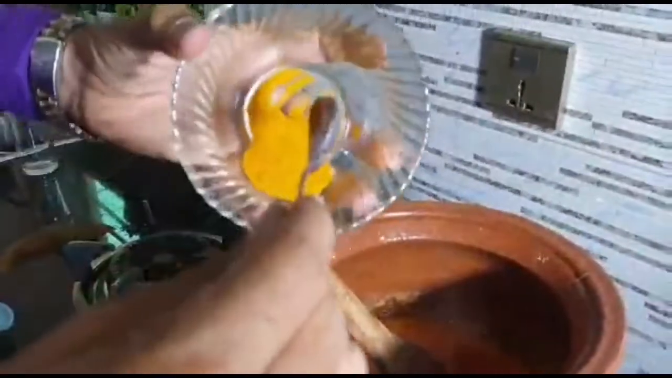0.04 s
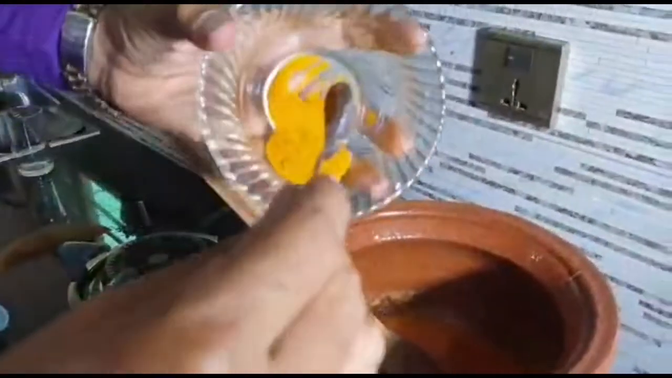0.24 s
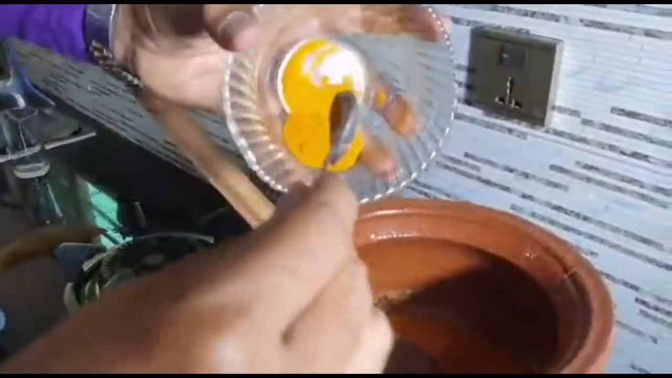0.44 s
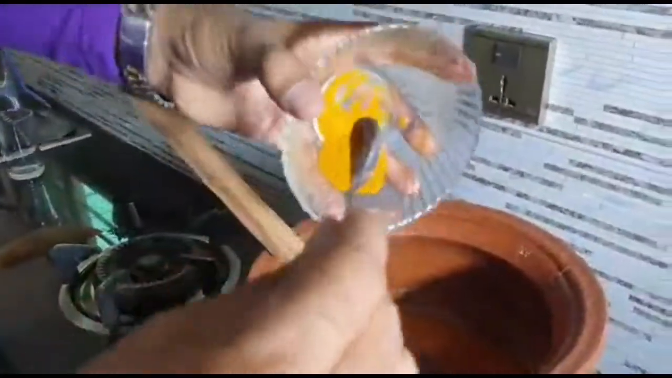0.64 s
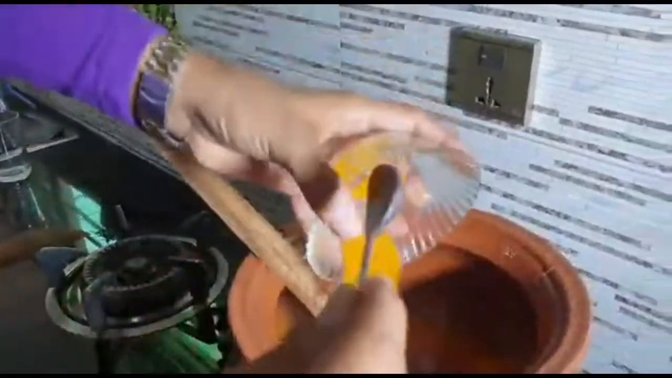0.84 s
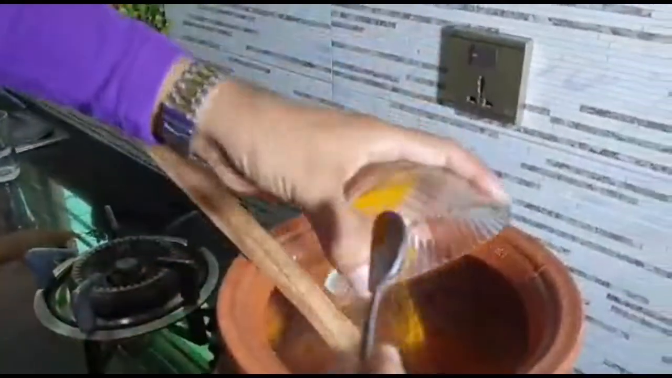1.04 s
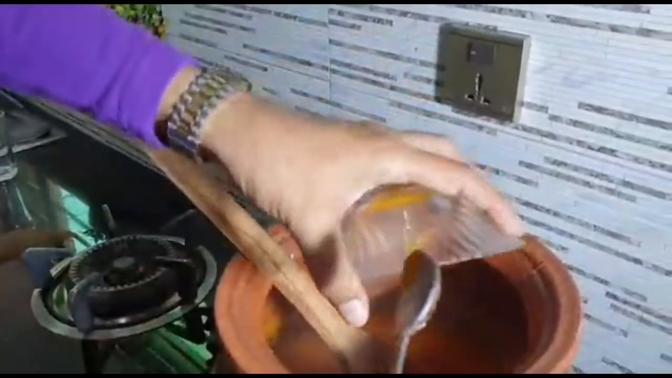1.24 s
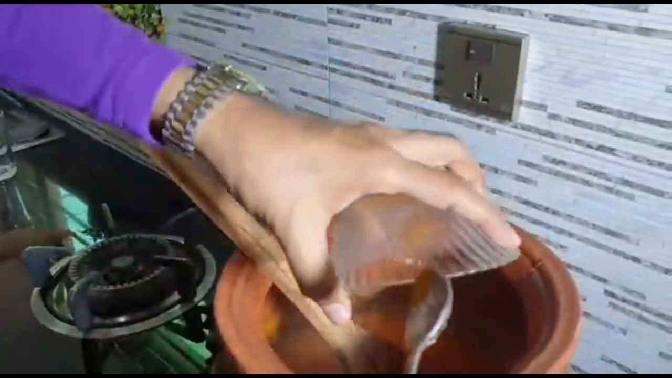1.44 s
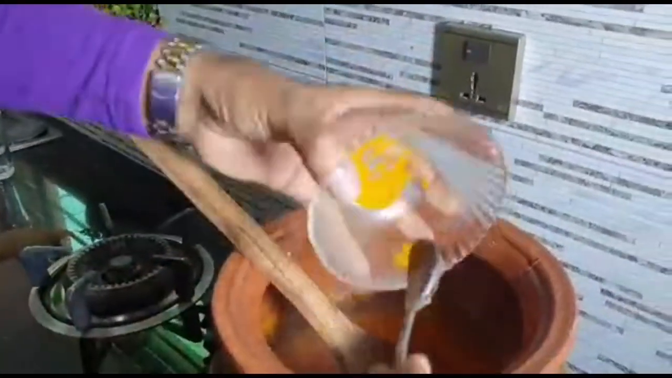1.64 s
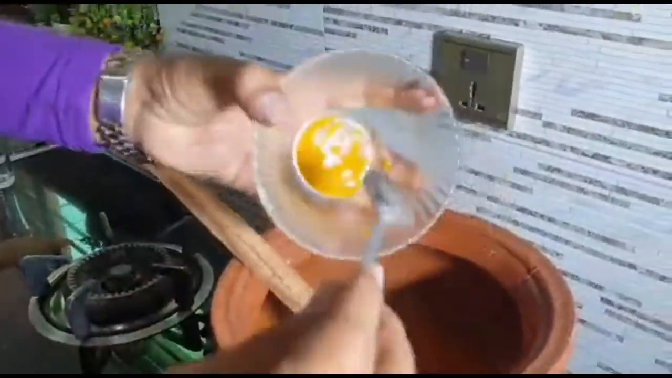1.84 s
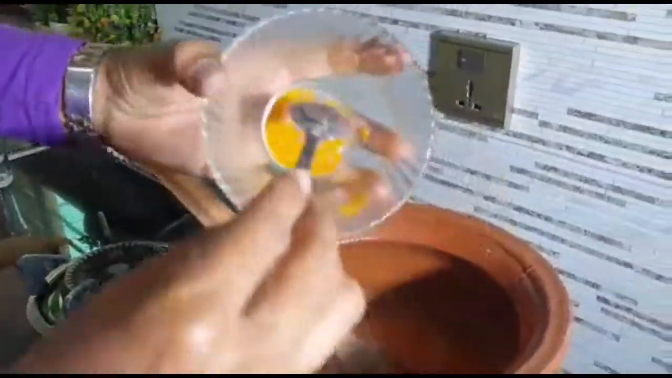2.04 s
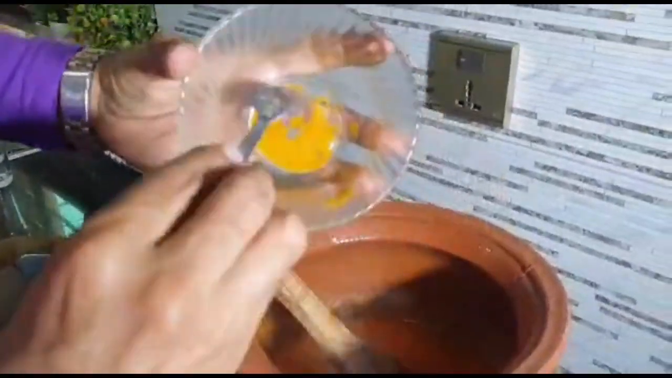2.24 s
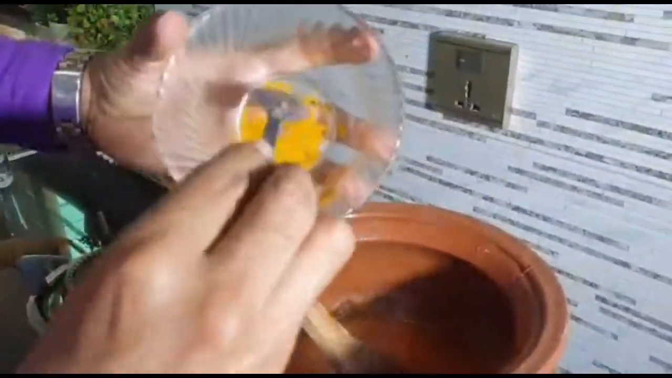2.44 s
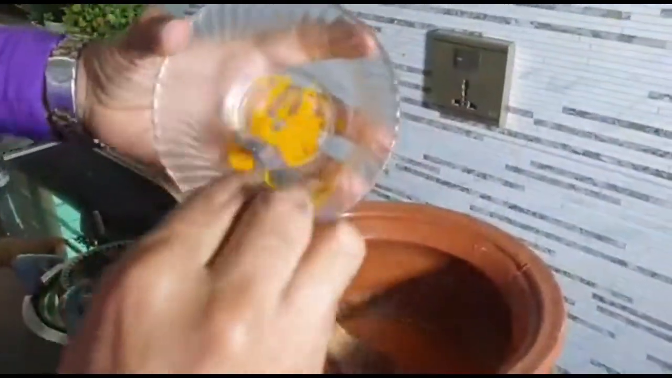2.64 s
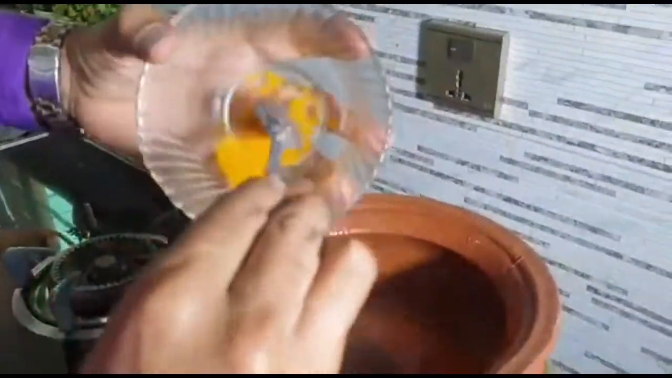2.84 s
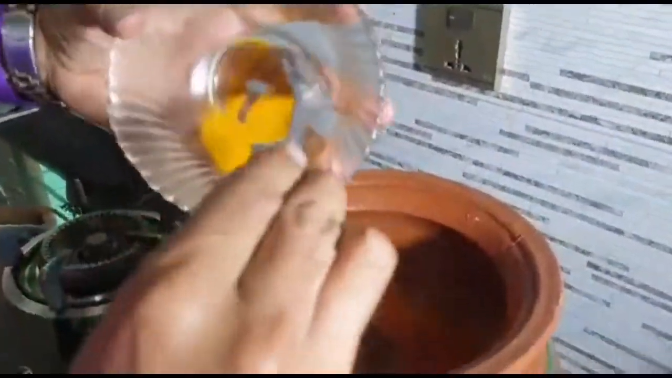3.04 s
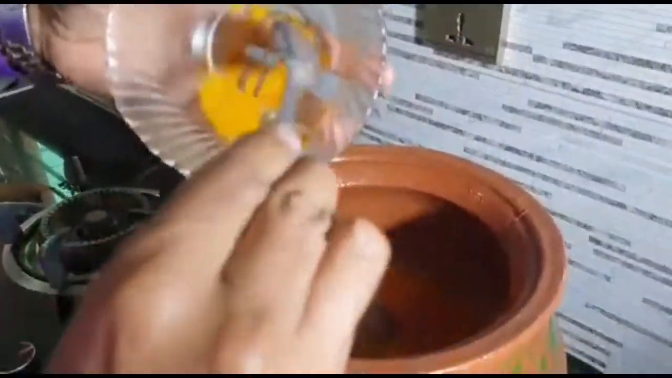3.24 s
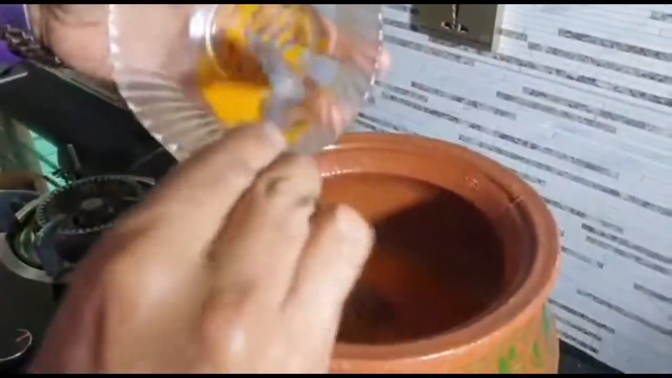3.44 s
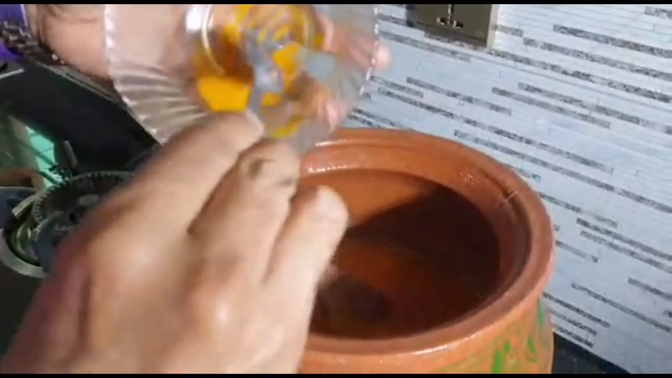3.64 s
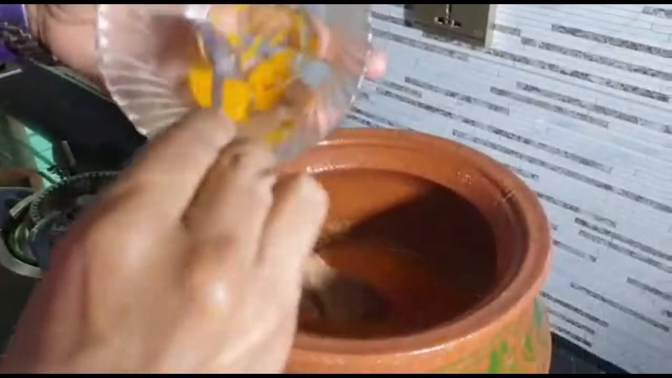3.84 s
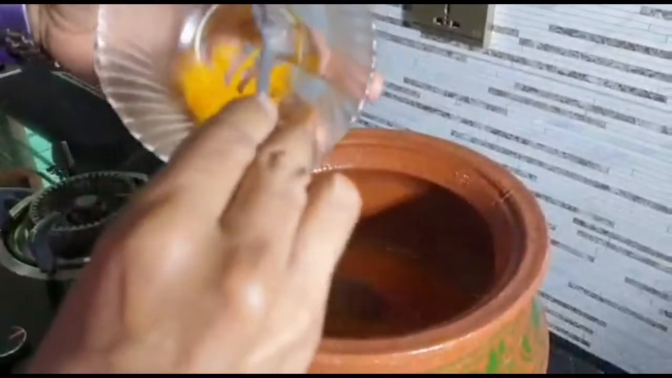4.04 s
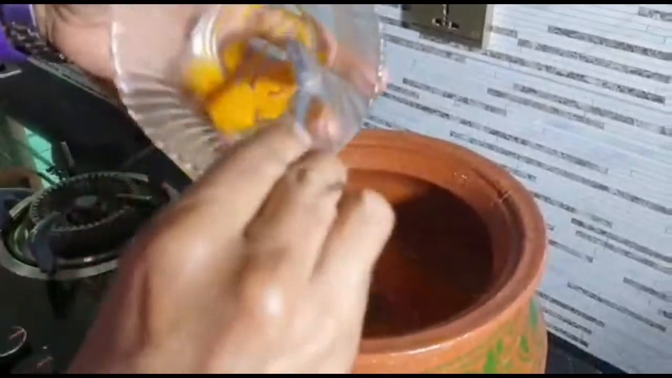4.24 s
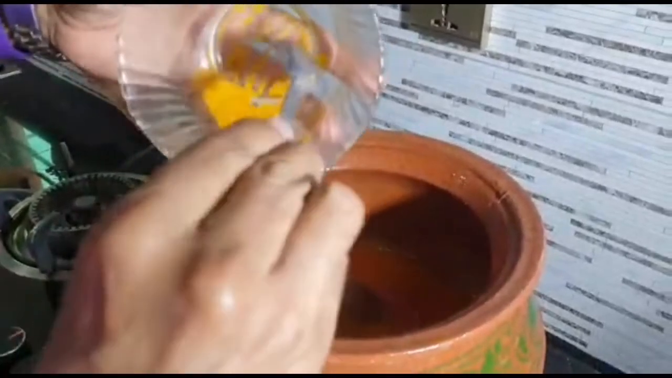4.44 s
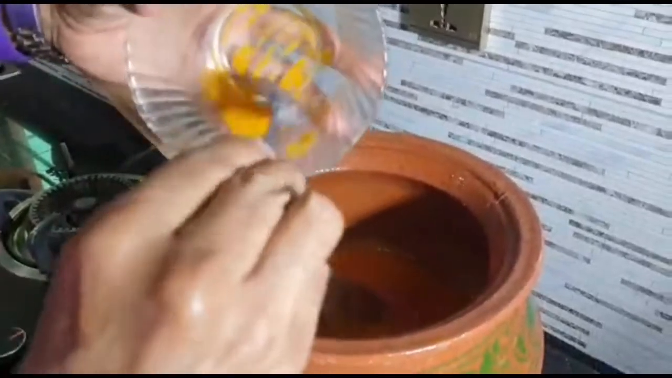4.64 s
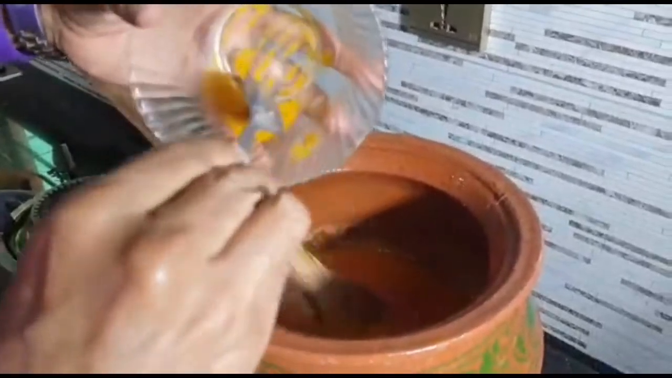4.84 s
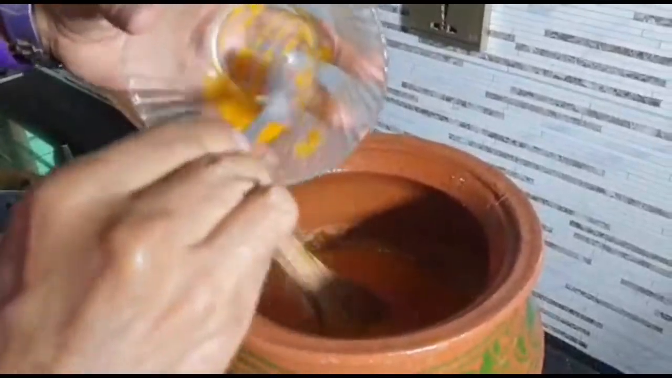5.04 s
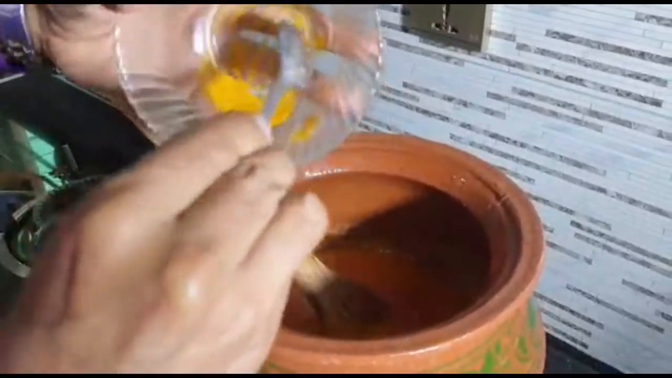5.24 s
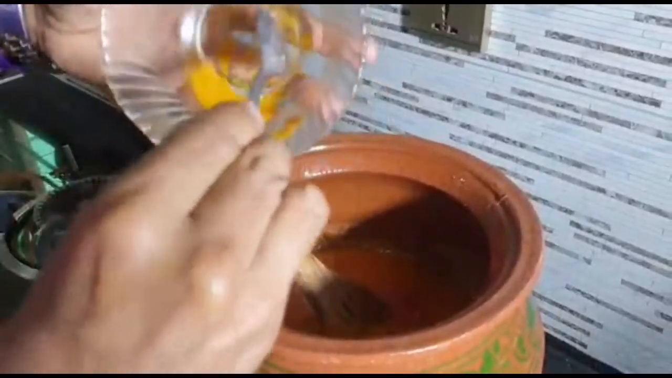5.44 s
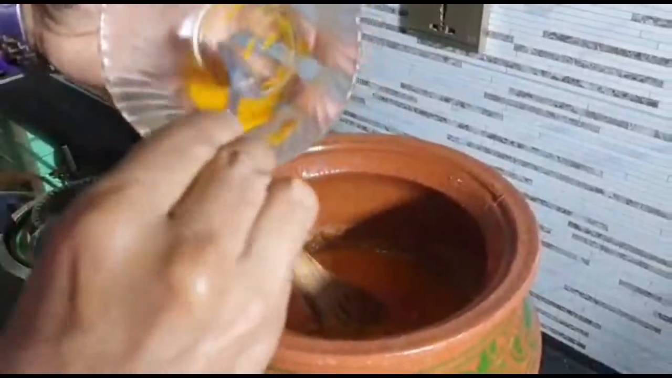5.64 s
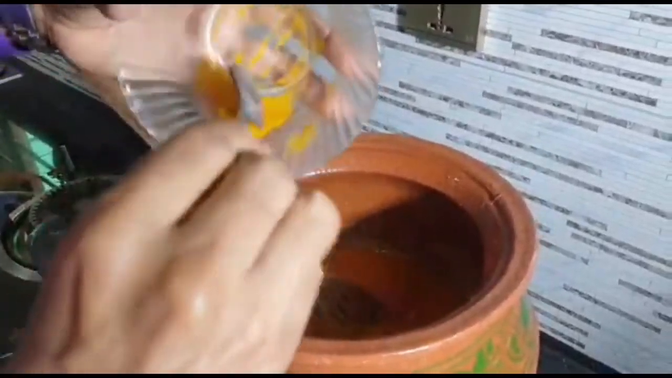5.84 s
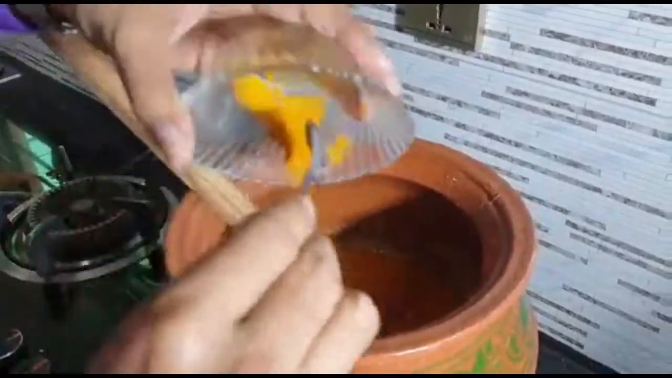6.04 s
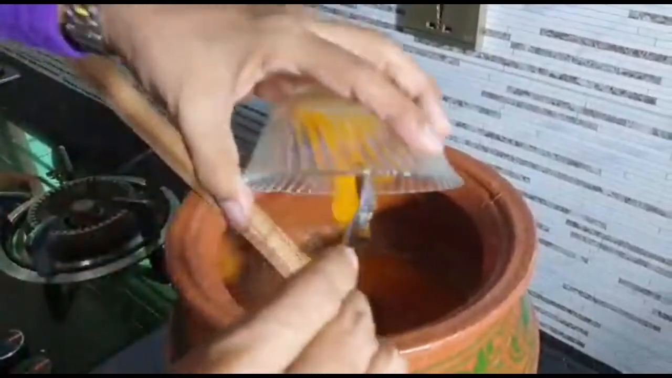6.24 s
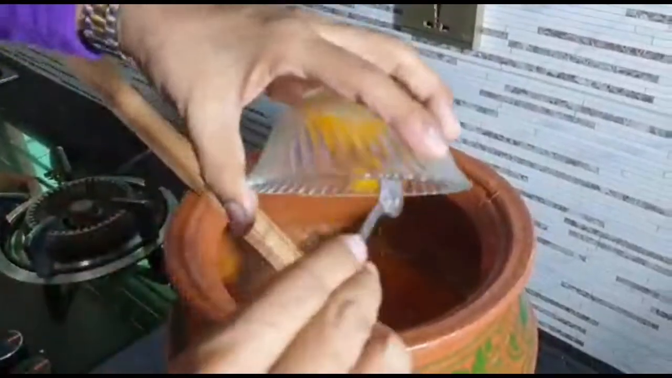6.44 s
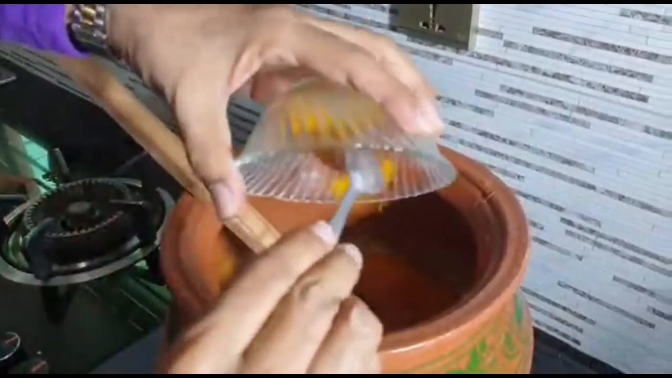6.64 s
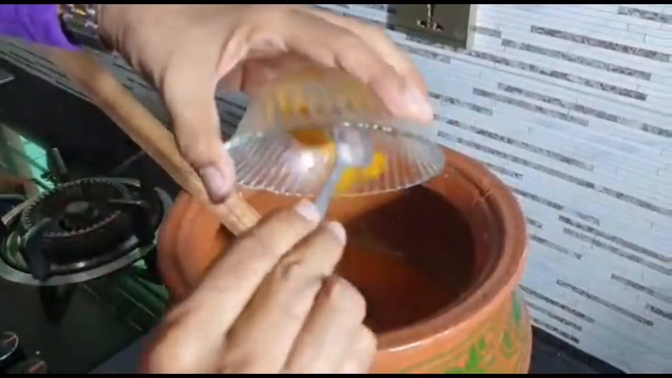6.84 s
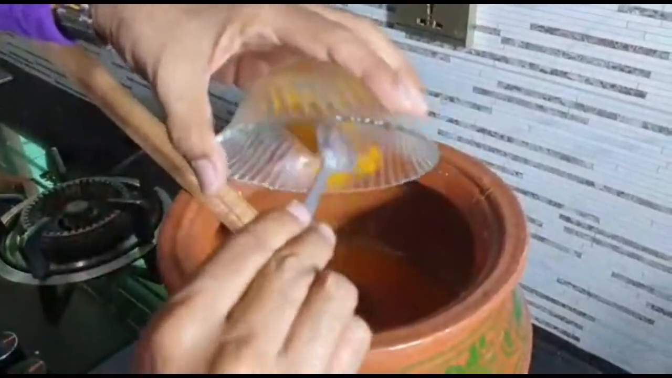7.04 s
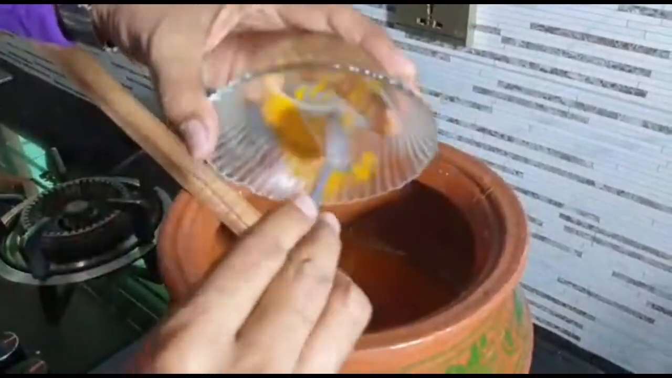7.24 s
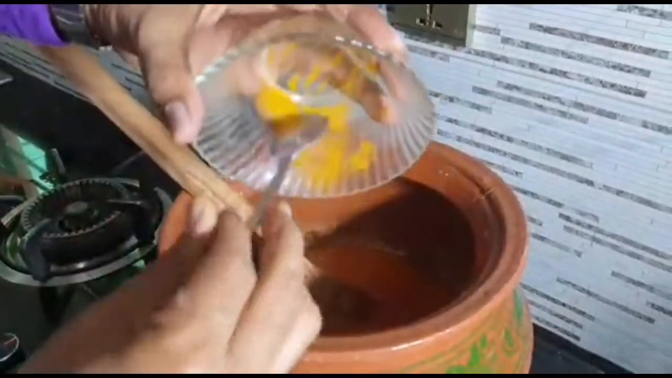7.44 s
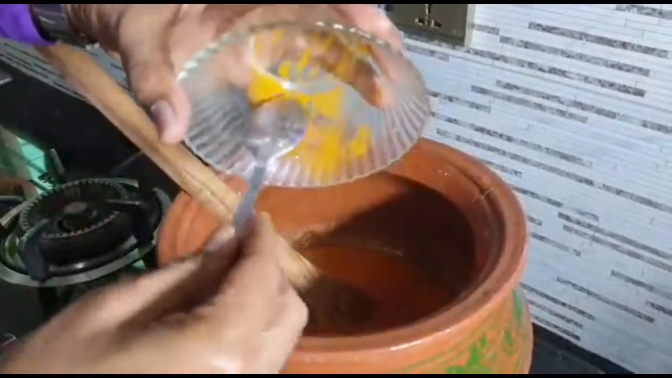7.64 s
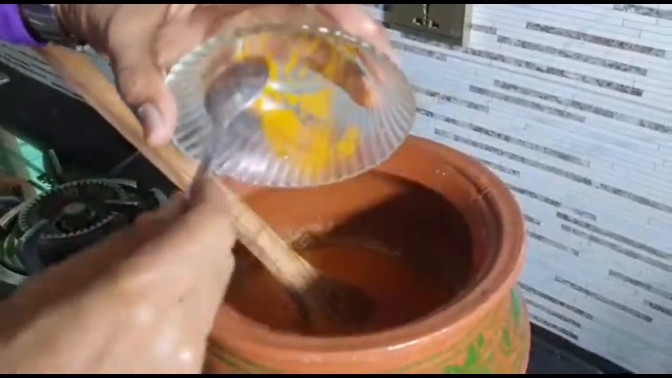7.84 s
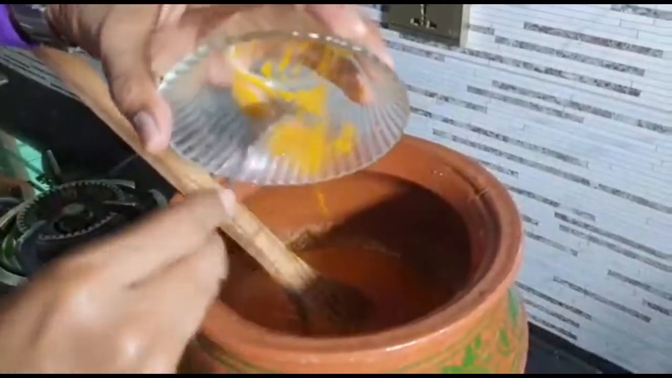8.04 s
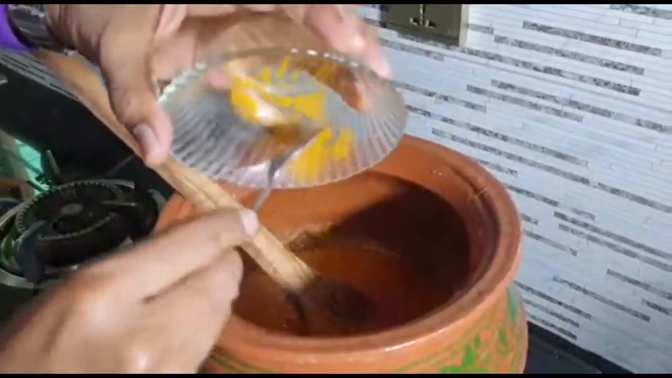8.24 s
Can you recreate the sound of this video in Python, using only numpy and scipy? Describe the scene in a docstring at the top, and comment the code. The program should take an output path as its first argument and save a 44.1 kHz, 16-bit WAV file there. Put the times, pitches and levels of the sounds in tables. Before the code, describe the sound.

A wavering low hum and soft rustle of hands and powder fill the first two seconds, with a faint, more distant utensil clink at 0.3 s, barely audible touches and a very faint steel ring near 1.2 s. From 2.3 to 5.9 s a steel spoon digs into a hand-held glass bowl, about four strokes a second: dull, damped clacks, some sharper and sizzling, followed by short gritty, squeaky scrapes. Glass rings out at about 3.6 and 4.3 s; low thumps on the right fall near 3.6 and 3.9 s. The hum sinks around 5 to 6 s, then returns during a lull of light ticks. From 6.7 to 7.4 s five taps ring the tipped bowl, two with thumps. Weaker contacts come at 7.9 s, then a clear ringing tap with a thump at 8.2 s and a brief hollow clay-pot rub. Close microphone, reflective kitchen.

```python
"""A low hum and a soft rustle of hands and powder come first, then a faint clink and light touches in the powder.
Then a steel spoon digs spice powder out of a hand-held glass bowl, close to the microphone, in a kitchen.
Pressed into the base it clacks dully and scrapes; against the free wall it makes the glass ring.
Some blows come with a low thump, mostly on the right; last comes a brief hollow rub at the clay pot below.
Blows are shaped noise bursts plus fading sines; scrapes, rustle and hum are shaped noise."""
import sys
import numpy as np
from scipy import signal
from scipy.fft import rfft, irfft, next_fast_len
from scipy.io import wavfile
from scipy.ndimage import map_coordinates

SR = 44100
rng = np.random.default_rng(int(sys.argv[2]) if len(sys.argv) > 2 else 0)


def master_out(mix):
    """Clip the mix to full scale and print it as 16-bit PCM to the path in sys.argv[1]."""
    frames = np.transpose(np.atleast_2d(mix))
    ceiling = np.clip(frames, -1, 1)
    pcm = np.round(ceiling * 32767).astype(np.int16)
    wavfile.write(sys.argv[1], SR, pcm)


N = 366030  # length of the scene in samples
T = np.arange(SR // 2) / SR  # the half-second life of one blow, in seconds

# Spectrum of the sharp crack of a hard contact: pitch_hz [Hz], level_db [dB per Hz]
CRACK_SPECTRUM = [(1200, -31.5), (2100, -3.5), (2800, 4), (3700, 2), (4500, 0), (5200, 3), (6000, -1.5),
                  (7200, 2.5), (8300, -15), (10000, -21), (14000, -34.5)]
# Spectrum of the treble sizzle of a contact: pitch_hz [Hz], level_db [dB per Hz]
SIZZLE_SPECTRUM = [(7000, -24.5), (9300, -3), (9900, -5), (10700, -14), (11600, -2.5), (12300, -12),
                   (13450, 3.5), (14350, -15.5), (14900, 1), (15700, -13.5)]
# Spectrum of crushed powder grains: pitch_hz [Hz], level_db [dB per Hz]
GRIT_SPECTRUM = [(300, -1), (1300, -2), (2200, -4), (4200, -12.5), (5200, -8), (7200, -5.5), (8400, -9),
                 (11500, -5), (15000, -29), (16000, -20.5)]
# The spoon's own modes: pitch_hz [Hz], level_db [dB], t60_s [s], left_over_right_db [dB]
SPOON_MODES = [(9820, -2, .28, -5), (9960, 0, .08, -6), (10350, -13, .06, -5), (13520, -6, .14, -2)]

SIZZLE_GROWS = 1.5  # dB of sizzle gained per dB of hardness


def digs():
    """The spoon digs into the base: the harder the contact, the more of the blow goes into the treble."""
    # Digs; powder cushions the spoon, bare glass makes the contact hard:
    # start_s [s], strength_db [dB], hardness_db [dB], ring_db [dB over the strength]
    dig_rows = [(2.3001, -27, -16.5, -36), (2.5744, -36, -21, -44), (2.8595, -22, -6.5, -7),
                (3.1353, -23.5, -19.5, -23), (3.3775, -28, -11, -10), (3.3868, -23.5, -17, -18),
                (3.615, -29, -12, -4), (3.8208, -33, 2.5, -15), (3.9366, -27.5, 5, -4),
                (4.0872, -39.5, -6, -28), (4.2028, -32, 1, -26), (4.345, -28.5, -10, -2),
                (4.5795, -26.5, -11.5, -24), (4.6765, -33.5, -12, -18), (4.8011, -32.5, -8, -10),
                (4.822, -26.5, -9, -30), (5.0597, -24, -7.5, -22), (5.1499, -29.5, -3.5, -7),
                (5.299, -23.5, -10, -26), (5.535, -27.5, -6, -21), (5.8203, -25.5, -5, -24),
                (5.9284, -35.5, -15, -30), (7.883, -38, -13.5, -19)]
    # Where the spoon digs: time_s [s], left_over_right_db [dB]
    dig_side = [(2.3, -3), (3.1, -1), (4.4, .5), (5.0, -2), (7.9, 0)]
    out = np.zeros((2, N))
    for start_s, strength_db, hardness_db, ring_db in dig_rows:
        # a spoon that stays pressed in the base chokes the after-ring
        release = 1 / (1 + amp(-ring_db - 10.5))
        low_db = strength_db + ring_db
        hit = blow(
            clack_db=strength_db,
            crack_db=strength_db + hardness_db,
            sizzle_db=strength_db - 5.5 + SIZZLE_GROWS * hardness_db,
            ting_db=strength_db - 4 + 1.4 * hardness_db,
            low_db=low_db,
            high_db=low_db - 12,  # a dig wakes the high modes less than the low ones
            release=release)
        side_db = np.interp(start_s, *np.transpose(dig_side))
        add(out, start_s, pan(side_db) * hit)
    return out


def taps():
    """The wall rings freely; tipped over the pot and gripped from above, the bowl clacks more and sizzles less."""
    # Taps on the free wall: start_s [s], crack_db, low_ring_db, high_ring_db, spoon_ting_db [all dB],
    # tipped [0 upright to 1 tipped], after_ring_db [dB]
    tap_rows = [(3.584, -24, -20.5, -14.5, -50, 0, -.5), (4.3285, -26.5, -17, -15, -40, 0, -3),
                (6.692, -23.5, -27, -19, -48, 1, -.5), (6.8438, -22, -24.5, -17, -41, 1, -.5),
                (7.0011, -24, -18, -29, -30, 1, -2), (7.1611, -20, -18, -19.5, -27, .8, 0),
                (7.3828, -31, -26.5, -30, -60, 1, -1), (7.9263, -39.5, -37, -35, -65, .3, -7),
                (8.1815, -24, -20, -16, -45, 0, 0)]
    out = np.zeros((2, N))
    for start_s, crack_db, low_db, high_db, ting_db, tipped, after_db in tap_rows:
        # each pair holds the value for the upright and for the tipped bowl
        clack_db = crack_db + np.interp(tipped, (0, 1), (-10, -4))
        sizzle_db = crack_db + np.interp(tipped, (0, 1), (1, -13))
        side_db = np.interp(tipped, (0, 1), (2.5, -1.8))
        hit = blow(clack_db, crack_db, sizzle_db, ting_db, low_db, high_db, release=amp(after_db))
        add(out, start_s, pan(side_db) * hit)
    return out


def blow(clack_db, crack_db, sizzle_db, ting_db, low_db, high_db, release):
    """One contact: the base's damped clack, a crack with sizzle, the spoon's ting, the glass's ring and the room."""
    # Spectrum of the dull clack: pitch_hz [Hz], level_db [dB per Hz]
    clack_spectrum = [(120, -28), (300, -18), (600, -12), (850, -3.5), (1040, -5), (1200, 2.5), (1520, -.5),
                      (1800, -9), (2300, -16.5), (2850, -17), (3500, -38)]
    # Damped modes of bowl and spoon pressed together: pitch_hz [Hz], level_db [dB], t60_s [s],
    # left_over_right_db [dB]
    pressed_modes = [(850, -2, .05, 5), (1040, -7, .05, 5), (1184, -2, .06, 4), (1336, -3, .18, 2),
                     (1512, -2, .06, 6), (1733, -5, .06, 6), (2290, -11, .08, 6), (2762, -10, .15, 4)]
    # The bowl's low and high modes, struck separately; same columns
    low_modes = [(1340, -17, .45, 3), (2790, -20, .22, 3), (3456, -2, .45, 5), (3470, -3, .42, 5),
                 (3570, -13, .12, 2), (3790, -15, .1, 2), (4050, -17, .1, 0), (5100, -19, .2, 0)]
    high_modes = [(6178, -5, .33, -5), (6196, -1, .35, -6), (6330, -14, .1, -6), (6900, -14, .12, -2),
                  (9283, -17, .25, -1), (9812, -16, .35, -7), (11200, -24, .14, 0), (14790, -21, .27, 1)]

    clack = amp(clack_db - 2.7) * pan(6.4) * burst(clack_spectrum, t60=.036, spike=0.82, apart=0.75)
    clack += amp(clack_db - 6) * ring(pressed_modes, grip_t60=.04, free=.07, scatter_db=2.5)
    clack = lead_left(clack)

    crack = amp(crack_db) * pan(0.96) * burst(CRACK_SPECTRUM, t60=.052, spike=0.17, apart=1.0)
    crack += amp(sizzle_db) * pan(-1) * burst(SIZZLE_SPECTRUM, t60=.052, spike=0.26, apart=.9)

    glass = amp(low_db) * ring(low_modes, grip_t60=.06, free=0.15 * release, scatter_db=0)
    glass += amp(high_db) * ring(high_modes, grip_t60=.055, free=.05, scatter_db=0.5)
    ting = amp(ting_db) * ring(SPOON_MODES, grip_t60=0.041, free=.12, scatter_db=1.0)

    to_room = amp(-12.5) * clack + amp(-11.5) * crack
    to_room = to_room + amp(-13) * np.sqrt(release) * glass + amp(-17.5) * ting
    sound = kitchen(to_room)
    sound[:, :len(T)] += clack + crack + glass + ting
    return sound


def lead_left(x, lag_s=.00012):
    """The base of the bowl lies nearer the left port, so its sound reaches the right one later."""
    lags = np.array([[0], [lag_s]])
    return filtered(x, lambda hz: np.exp(-2j * np.pi * hz * lags))


def ticks():
    """Light touches are too soft to set the glass ringing; they brighten with hardness as the digs do."""
    # Touches in the powder: start_s [s], strength_db [dB], hardness_db [dB]
    tick_rows = [(0.476, -54, -8), (0.5218, -47.5, -16), (0.645, -53, -3), (0.7268, -52, -1),
                 (1.1284, -53.5, 0), (1.1639, -53, 3), (1.185, -50, 2.5), (1.509, -60, 2), (1.7791, -63, 9),
                 (1.8343, -52, 2.5), (1.915, -51.5, -11), (2.1037, -68, 8), (2.185, -60, 2),
                 (2.4146, -50, 4), (2.5342, -65, 8), (3.2526, -52, 3), (3.3249, -63, 3), (3.5095, -57, 3),
                 (4.438, -45, -7), (4.9766, -54.5, -6), (5.0166, -61, 2), (6.1208, -55, -4),
                 (6.2618, -63, 6), (6.6243, -63, 2), (7.102, -58, 6)]
    # Spectrum of a soft touch: pitch_hz [Hz], level_db [dB per Hz]
    touch_spectrum = [(200, -14), (400, -5.5), (750, -3.5), (900, -7.5), (1100, 2.5), (1300, -10.5),
                      (1600, -13), (3000, -30)]
    out = np.zeros((2, N))
    for start_s, strength_db, hardness_db in tick_rows:
        crack_db = strength_db + hardness_db - 1
        sizzle_db = strength_db - 7.5 + SIZZLE_GROWS * hardness_db
        tick = amp(strength_db + 2.0) * burst(touch_spectrum, t60=.08, spike=.3, apart=.6)
        tick += amp(crack_db) * burst(CRACK_SPECTRUM, t60=0.11, spike=0.19, apart=.8)
        tick += amp(sizzle_db) * burst(SIZZLE_SPECTRUM, t60=.04, spike=.3, apart=0.76)
        add(out, start_s, tick)
    return in_kitchen(out, wet_db=-9)[:, :N]


def scrapes(firm_db=-55, squeak_grows=.5):
    """Tiny slips of the dragged edge excite its resonances and crush powder; firm strokes squeak more."""
    # Strokes of the edge over the glass: start_s [s], length_s [s], strength_db [dB]
    scrape_rows = [(2.337, .145, -63), (2.626, .142, -62), (2.889, .117, -51), (3.148, .124, -56),
                   (3.409, .105, -57.5), (4.374, .102, -55.5), (4.605, .1, -63), (4.849, .087, -64),
                   (5.096, .09, -57.5), (5.335, .088, -58.5), (5.597, .106, -56), (5.865, .09, -69),
                   (7.905, .114, -62)]
    # The dragged spoon's high resonances: pitch_hz [Hz], width_hz [Hz], level_db [dB, each of two passes]
    edge_modes = [(13450, 380, 0.5), (14850, 450, -5.5)]
    out = np.zeros((2, N))
    for start_s, length_s, strength_db in scrape_rows:
        size = max(int(length_s * SR), 256)
        pressure = signal.windows.tukey(size, .7)
        roughness_db = 2.5 * wobble(600, size) + 2.5 * wobble(45, size)
        slips = unit(amp(roughness_db)) * pressure

        # the squeak's pitch rises with the pressure and trembles
        squeak_hz = 9850 + 450 * pressure + 170 * wobble(35, size) + 260 * wobble(1500, size)
        cycles = np.cumsum(squeak_hz) / SR + rng.random((2, 1))
        squeak = slips * unit(np.sin(2 * np.pi * cycles))

        edge = resonate(slips * white(size, 1.0), edge_modes)
        edge = unit(resonate(edge, edge_modes))  # a second pass sharpens the resonances
        grit = slips * noise(GRIT_SPECTRUM, size, 0.88)

        squeak_db = squeak_grows * (strength_db - firm_db) + .8
        stroke = amp(squeak_db) * pan(-4.5) * squeak + amp(-.6) * edge + amp(3) * grit
        add(out, start_s, in_kitchen(amp(strength_db) * stroke, wet_db=-13))
    return out


def bright_tings():
    """Bright spoon tings, two at the moment of a dig and two during scrapes, with a little crack and sizzle."""
    # Tings: start_s [s], ting_db [dB]
    ting_rows = [(2.8595, -34), (2.9409, -35), (3.1867, -37.5), (5.0597, -29.5)]
    out = np.zeros((2, N))
    for start_s, ting_db in ting_rows:
        ting = amp(ting_db) * ring(SPOON_MODES, grip_t60=.045, free=.08, scatter_db=1.0)
        ting += amp(ting_db - 9) * burst(CRACK_SPECTRUM, t60=.05, spike=.2, apart=.9)
        ting += amp(ting_db - 10) * burst(SIZZLE_SPECTRUM, t60=.05, spike=.2, apart=.9)
        add(out, start_s, ting)
    return in_kitchen(out, wet_db=-13)[:, :N]


def thumps():
    """Some blows, four taps and one dig, come with a low thump, mostly on the right: a fast-fading 62 Hz swing."""
    # Thumps: start_s [s], strength_db [dB, before each side's own gain]
    thump_rows = [(3.583, -19.5), (3.939, -19.5), (6.846, -24), (7.163, -23.5), (8.183, -17)]
    side_gain = amp([[-24], [5]])  # left, right
    swing = np.cos(2 * np.pi * 62 * T) * fade(0.054) * (1 - fade(.012))
    out = np.zeros((2, N))
    for start_s, strength_db in thump_rows:
        add(out, start_s, side_gain * amp(strength_db) * swing)
    return out


def steel_ring(start_s=1.19, level_db=-61.5, hz=4000, t60=.8):
    """Before the digging, a faint steady steel ring near 4 kHz, in one mode."""
    out = np.zeros((2, N))
    tone = ring([(hz, 0, t60, 0)], grip_t60=.05, free=.5, scatter_db=0)
    add(out, start_s, in_kitchen(amp(level_db) * tone, wet_db=-3))
    return out


def pot_rub(start_s=8.24, level_db=-37):
    """A brief rub, a short burst of noise, sounds the hollow of the clay pot."""
    # The pot's resonances: pitch_hz [Hz], width_hz [Hz], level_db [dB]
    pot_modes = [(280, 36, -3), (382, 21.4, 6), (746, 50, -5), (875, 34, -6), (1020, 80, -13),
                 (1407, 240, -10)]
    out = np.zeros((2, N))
    size = SR // 8
    hollow = unit(resonate(white(size, 0.22), pot_modes))
    softened = 1 - fade(0.045)[:size]  # a gentle start
    add(out, start_s, amp(level_db) * pan(2.5) * hollow * softened)
    return out


def clink(start_s=.264, level_db=-46.5, crack_db=-50):
    """One faint clink of a small utensil farther off: its modes ring, with a crack and much room."""
    # The utensil's modes: pitch_hz [Hz], level_db [dB], t60_s [s], left_over_right_db [dB]
    utensil_modes = [(1150, -6, .1, 0), (1400, -7, .06, 0), (1750, -8, .06, 0), (2150, -5, .07, 0),
                     (2700, -4, .08, 0), (2790, -2, .1, 0), (2895, -1, .18, 0), (4250, -7, .08, 0)]
    out = np.zeros((2, N))
    hit = amp(level_db) * ring(utensil_modes, grip_t60=.06, free=.15, scatter_db=1)
    hit += amp(crack_db) * burst(CRACK_SPECTRUM, t60=.06, spike=.3, apart=0.7)
    add(out, start_s, in_kitchen(hit, wet_db=-7))
    return out


def background():
    """A wavering low hum, still air, and the rustle of hands and powder with crumbs that slip one by one."""
    # Spectra of hum, air and powder: pitch_hz [Hz], level_db [dB per Hz]
    hum_spectrum = [(20, -42.5), (38, -15.5), (52, -8), (62, 3.5), (76, -3.5), (110, 0), (135, -9),
                    (180, -22.5), (300, -54.5)]
    air_spectrum = [(88, -27), (150, -2), (182, -6.5), (270, 1.5), (578, -5), (716, -17), (998, -16.5),
                    (1940, -27.5), (2920, -21), (3920, -29.5), (5910, -25), (8730, -40), (12700, -29.5),
                    (14800, -46.5), (16000, -58.5)]
    powder_spectrum = [(150, -12), (205, -6.5), (255, 5), (310, -3), (420, 2), (800, -7), (1100, -5.5),
                       (1500, -22), (3000, -24.5), (6000, -20.5), (9000, -32), (13000, -42.5), (16000, -52)]
    # Course of the hum: time_s [s], level_db [dB, before a fixed gain]
    hum_course = [(0.0, -54), (0.29, -54), (0.68, -51), (1.18, -52), (1.31, -49), (1.59, -48), (1.9, -49),
                  (1.97, -50), (4.79, -56), (5.22, -61), (5.31, -65), (5.58, -64), (5.72, -60), (6.2, -60),
                  (6.88, -50), (7.42, -53), (8.15, -51)]
    # Hands and powder shifting: time_s [s], motion_db [dB, before its swings are widened]
    handling = [(0.0, -59), (0.16, -59), (0.91, -54), (1.43, -54), (1.7, -52), (2.65, -54), (3.38, -52),
                (3.63, -56), (3.83, -57), (6.17, -57), (6.56, -59), (6.92, -56), (7.78, -61), (8.15, -58)]

    hum = amp(curve(hum_course) + 2.5) * pan(-1.2) * noise(hum_spectrum, N, 0.15)
    air = amp(-57.5) * noise(air_spectrum, N, 0.53)

    grains = unit(amp(3.8 * wobble(150, N) + 2.6 * wobble(14, N)))
    slips = rng.random(N) < 45 / SR  # about 45 crumbs a second
    slip_strength = amp(np.minimum(4 * rng.exponential(size=N), 12))
    crumb = burst(GRIT_SPECTRUM, t60=.02, spike=.3, apart=1.0)
    crumbs = signal.fftconvolve((slips * slip_strength)[None], crumb, axes=1)[:, :N]
    rustle = amp(-2.0) * grains * noise(powder_spectrum, N, 0.67) + amp(-18) * unit(crumbs)

    motion_db = curve(handling)
    mean_db = motion_db.mean()
    swing_db = 1.5 * (motion_db - mean_db)  # the rustle comes and goes against the still air
    return hum + air + amp(mean_db + swing_db + 2.6) * pan(1.5) * rustle


def kitchen(x):
    """The walls' answer: a fresh diffuse tail, each frequency dying at its own speed."""
    # Room decay: pitch_hz [Hz], t60_s [s]
    room_decay = [(200, 0.71), (1300, 0.56), (3500, 0.67), (7000, 0.39), (14000, 0.36)]
    hz, t, z = signal.stft(rng.standard_normal((2, len(T))), SR, nperseg=256)
    decay_db = -60 * t / along(room_decay, hz)[:, None]
    tail = signal.istft(z * amp(decay_db), SR, nperseg=256)[1][:, :len(T)]
    tail = tail * (1 - fade(0.019))  # the room builds up gradually
    return signal.fftconvolve(x, tail / np.linalg.norm(tail[0]), axes=1)


def in_kitchen(x, wet_db):
    """The direct sound together with its answer from the room."""
    return np.pad(x, ((0, 0), (0, len(T) - 1))) + amp(wet_db) * kitchen(x)


def burst(spectrum, t60, spike, apart):
    """A contact: one sharp push that reaches the left port first, in fading noise that the body colours."""
    size = 8192
    push = white(size, apart) * fade(t60)[:size]
    push /= np.linalg.norm(push[0])
    push[[0, 1], [0, 4]] += spike  # four samples later on the right
    hit = irfft(rfft(push) * causal(spectrum, size), size)
    return np.pad(struck(hit), ((0, 0), (0, len(T) - size)))


def causal(spectrum, size):
    """Minimum-phase response on the FFT grid: the body answers only after it is struck."""
    gain = amp(along(spectrum, np.fft.rfftfreq(size, 1 / SR)))
    cepstrum = irfft(np.log(gain), size)
    # fold the half before the blow onto the half after it
    cepstrum[1:size // 2] *= 2
    cepstrum[size // 2 + 1:] = 0
    return np.exp(rfft(cepstrum))


def ring(modes, grip_t60, free, scatter_db):
    """Modes start together and lose most of their swing to spoon and fingers; a share rings on freely."""
    out = 0
    gripped = fade(grip_t60)
    for hz, db, t60, side_db in modes:
        struck_hz = hz * (1 + rng.normal(0, 0.0011))
        # short waves differ more between the ports
        port_phase = rng.normal(0, hz / 2000, (2, 1))
        phase = 2 * np.pi * struck_hz * T + port_phase
        swing = np.sin(phase.astype(np.float32)) * (gripped + free * fade(t60))
        out = out + amp(db + rng.normal(0, scatter_db)) * pan(side_db) * swing
    return struck(out * (1 - fade(.001)))


def resonate(x, modes):
    """Send x through resonances of (Hz, width Hz, dB) with alternating signs."""
    def response(f):
        total = 0
        for k, (center, width, db) in enumerate(modes):
            peak = 1j * f * width / (center * center - f * f + 1j * f * width)
            total = total + (-1) ** k * amp(db) * peak
        return total
    return filtered(x, response)


def noise(spectrum, size, apart):
    """Steady stereo noise with the given spectrum, at rms 1."""
    return unit(filtered(white(size, apart), lambda hz: amp(along(spectrum, hz))))


def white(size, apart):
    """Stereo noise: a shared part and a part that differs between the ports."""
    mid, side = rng.standard_normal((2, size))
    return np.array([mid + apart * side, mid - apart * side])


def filtered(x, response):
    """Multiply the spectrum of x by a response of frequency."""
    n = x.shape[-1]
    m = next_fast_len(n + 4096)
    return irfft(rfft(x, m) * response(np.fft.rfftfreq(m, 1 / SR)), m)[..., :n]


def wobble(rate, size):
    """A smooth random curve, rate knots a second."""
    knots = rng.standard_normal(int(size * rate / SR) + 4)
    return map_coordinates(knots, [np.arange(size) * rate / SR])


def curve(rows):
    """Straight lines through (s, value) points, over the whole scene."""
    return np.interp(np.arange(N) / SR, *np.transpose(rows))


def along(points, hz):
    """Read (Hz, value) points on a log frequency axis."""
    f, v = np.transpose(points)
    return np.interp(np.log(hz + 1), np.log(f + 1), v)


def fade(t60):
    """Exponential decay that falls 60 dB in t60 seconds."""
    return np.exp(-np.log(1000) * T / max(t60, 1e-4))


def amp(db):
    """Decibels to amplitude."""
    return 10 ** (np.asarray(db) / 20)


def pan(db):
    """Left and right gains that differ by db; positive leans left."""
    return amp([[db / 2], [-db / 2]])


def unit(x):
    """Scale to rms 1."""
    return x / np.sqrt(np.mean(x ** 2) + 1e-20)


def struck(x):
    """Scale a hit to rms 1 over its first fiftieth of a second."""
    return x / np.sqrt(np.mean(x[..., :SR // 50] ** 2) + 1e-20)


def add(out, start_s, x):
    """Mix x into out from start_s, cut at the end of the scene."""
    i = round(start_s * SR)
    out[:, i:i + x.shape[1]] += x[:, :max(N - i, 0)]


def scene():
    """Spoon and bowl in front, then the pot and the utensil, with the background behind."""
    spoon = digs() + taps() + ticks() + scrapes() + bright_tings() + thumps() + steel_ring()
    return spoon + pot_rub() + clink() + background()


def record(dry, top_hz=15500):
    """Clip at full scale, thin the deepest bass and keep next to nothing above top_hz."""
    def response(hz):
        low_cut = (1j * hz / (1j * hz + 22)) ** 2
        band_limit = (1 - np.tanh((hz - top_hz) / 150)) / 2
        return low_cut * band_limit
    return filtered(np.clip(dry, -1, 1), response)


dry = scene()
out = record(dry)
master_out(out)
```